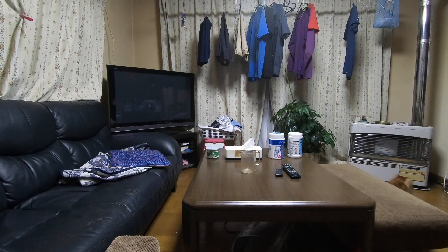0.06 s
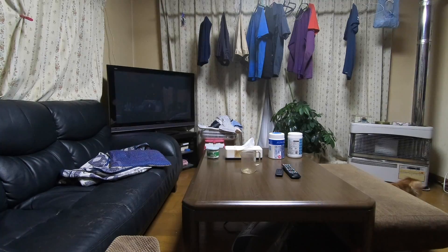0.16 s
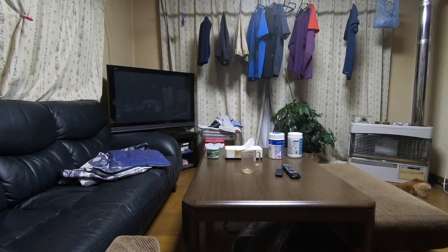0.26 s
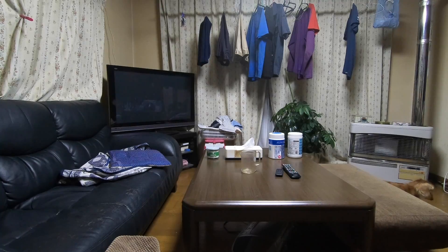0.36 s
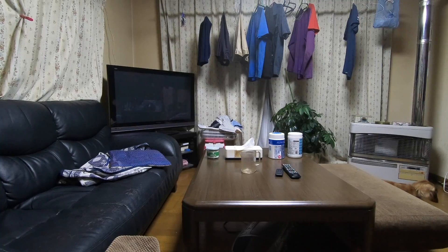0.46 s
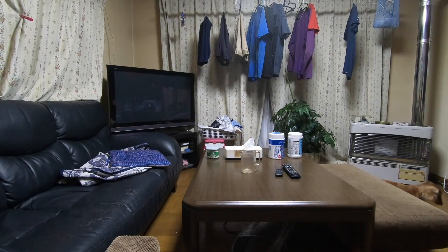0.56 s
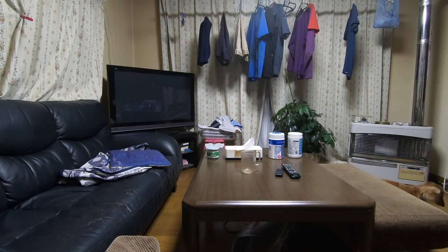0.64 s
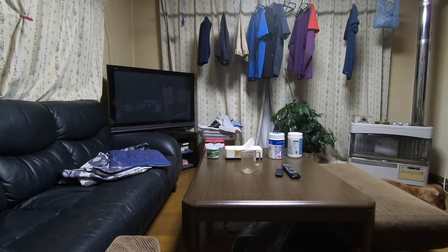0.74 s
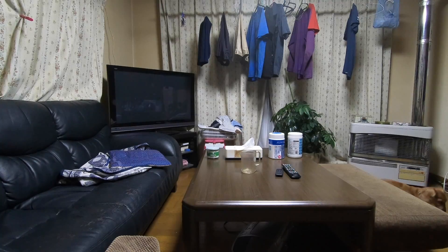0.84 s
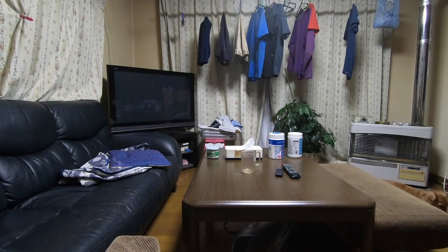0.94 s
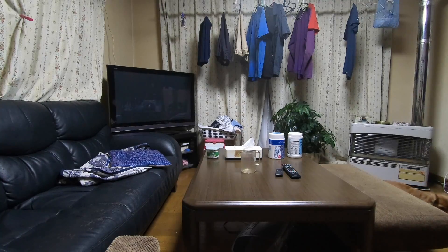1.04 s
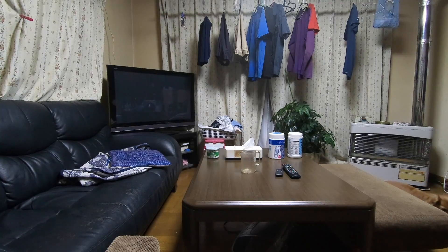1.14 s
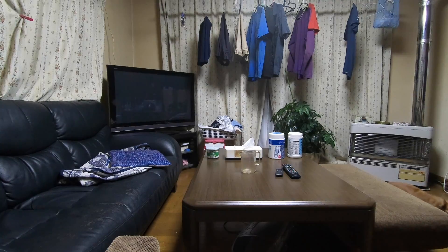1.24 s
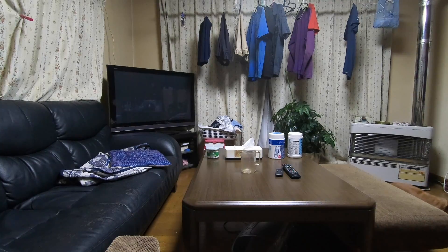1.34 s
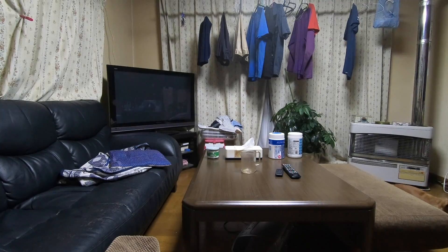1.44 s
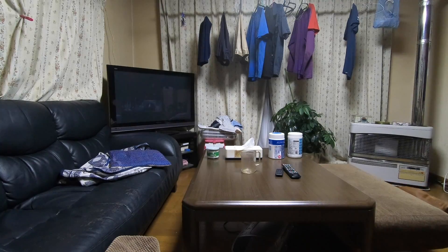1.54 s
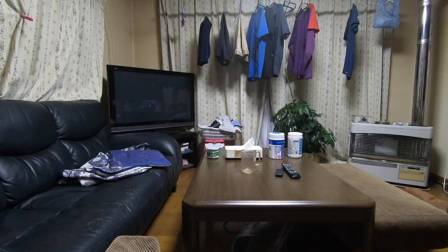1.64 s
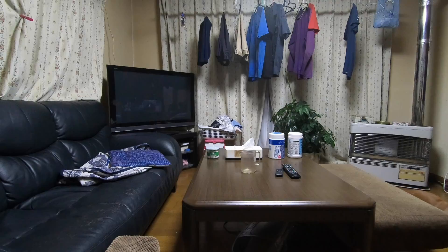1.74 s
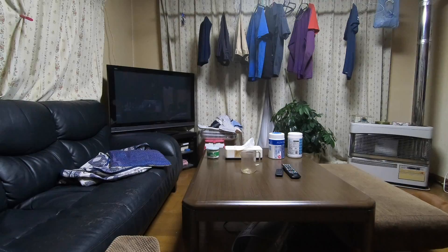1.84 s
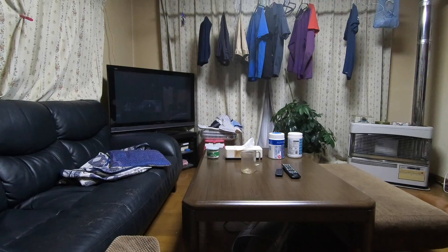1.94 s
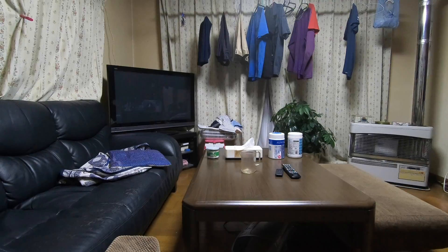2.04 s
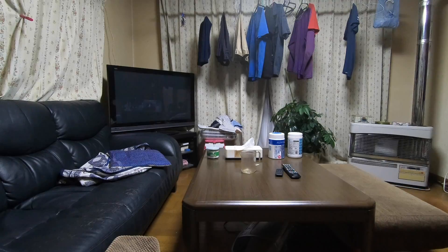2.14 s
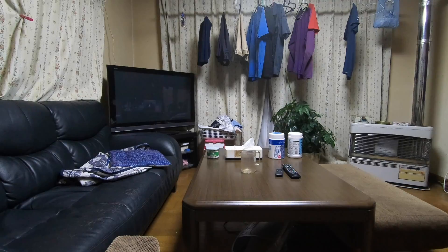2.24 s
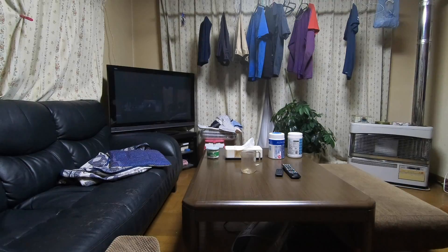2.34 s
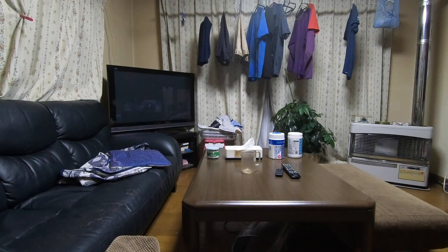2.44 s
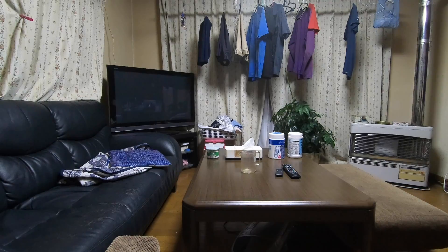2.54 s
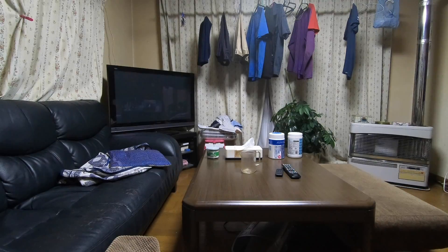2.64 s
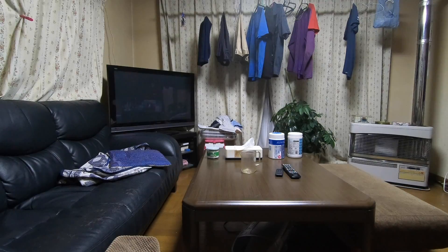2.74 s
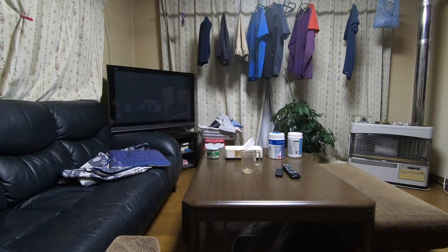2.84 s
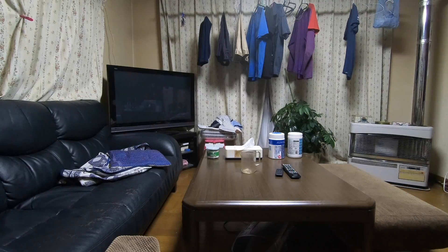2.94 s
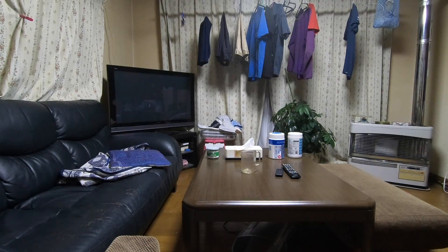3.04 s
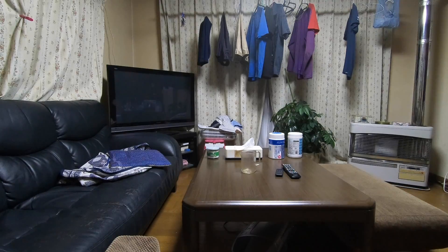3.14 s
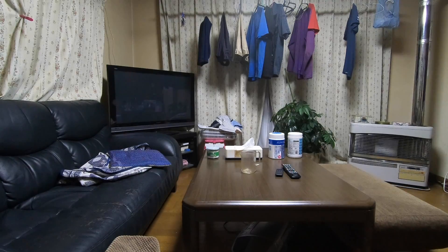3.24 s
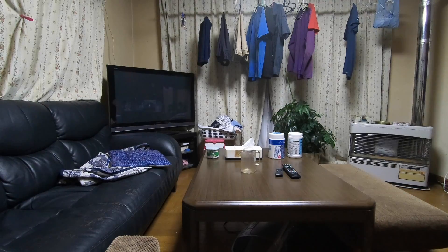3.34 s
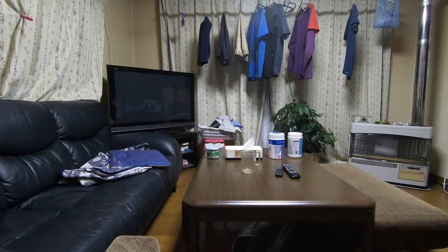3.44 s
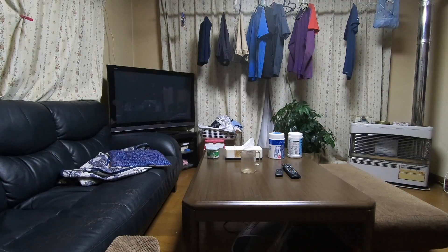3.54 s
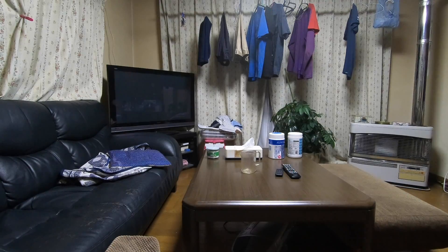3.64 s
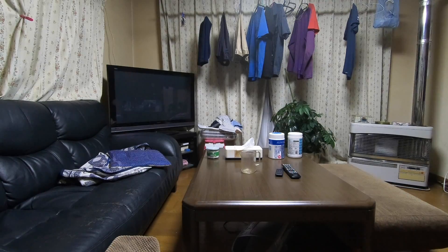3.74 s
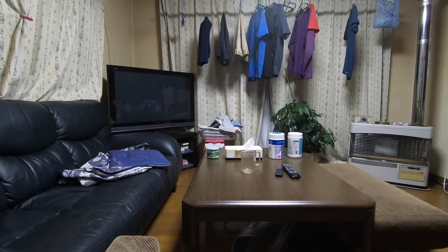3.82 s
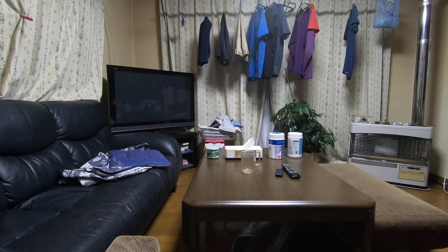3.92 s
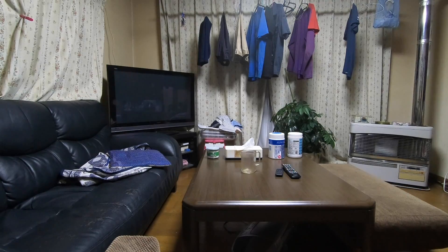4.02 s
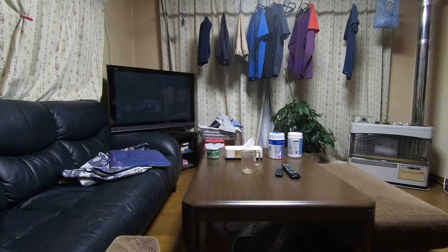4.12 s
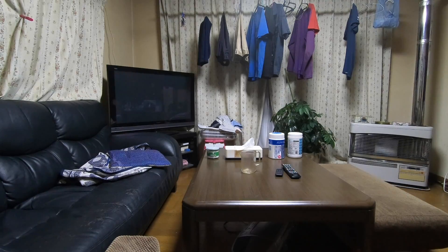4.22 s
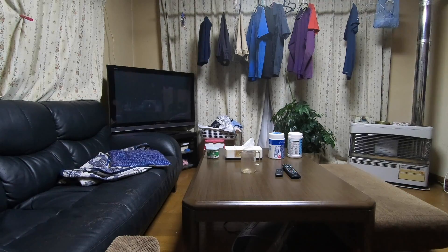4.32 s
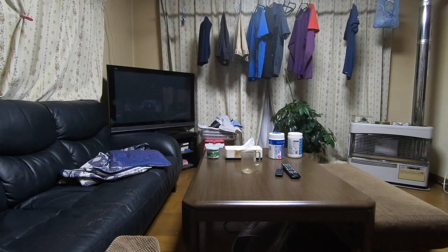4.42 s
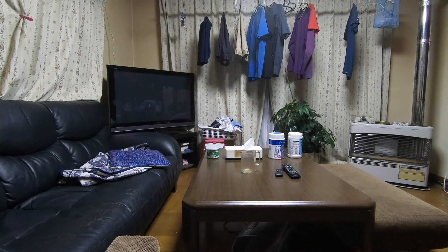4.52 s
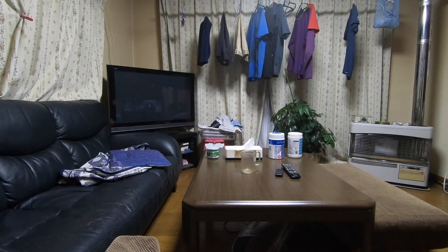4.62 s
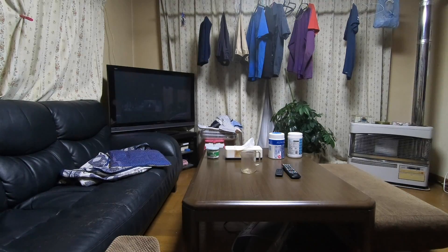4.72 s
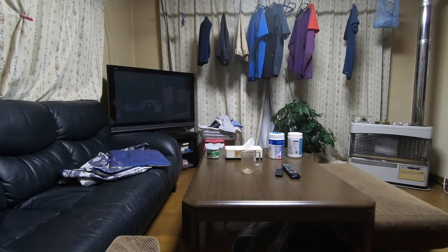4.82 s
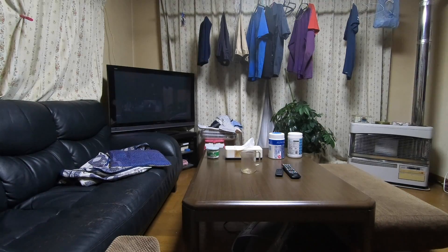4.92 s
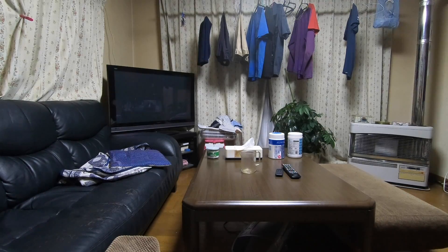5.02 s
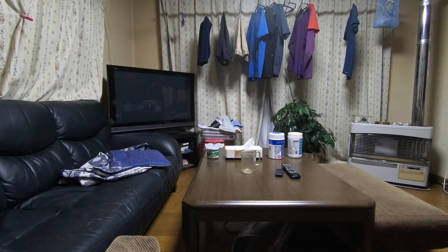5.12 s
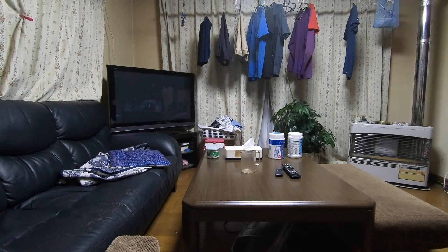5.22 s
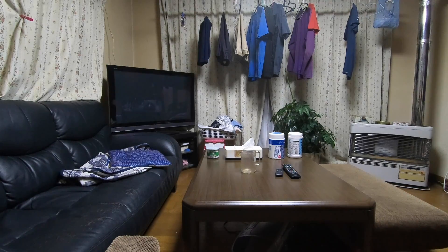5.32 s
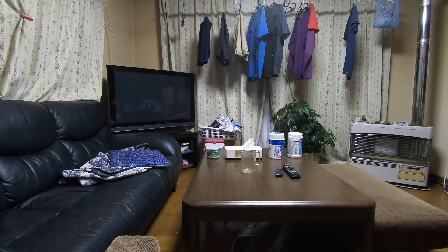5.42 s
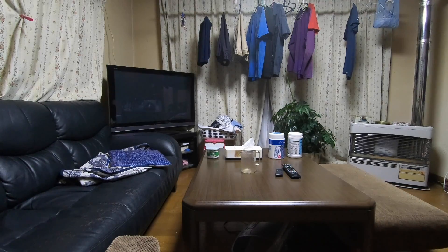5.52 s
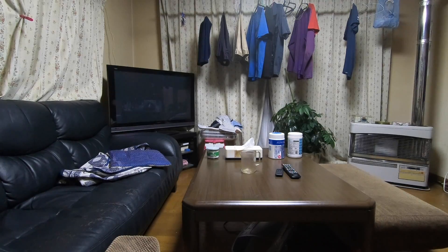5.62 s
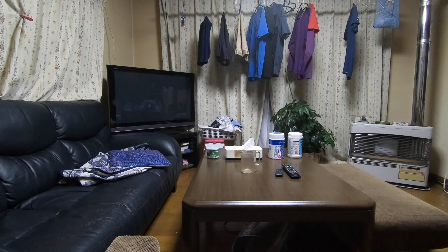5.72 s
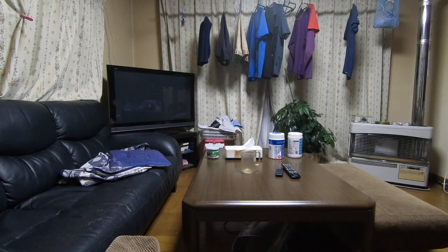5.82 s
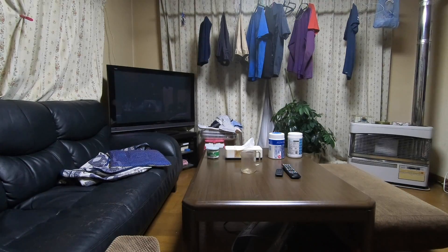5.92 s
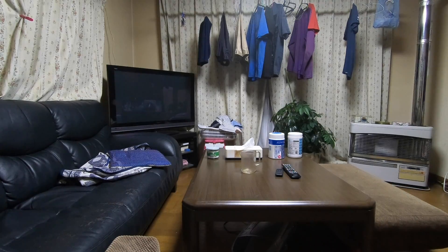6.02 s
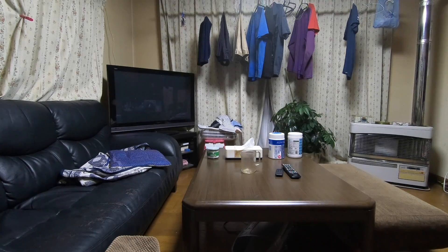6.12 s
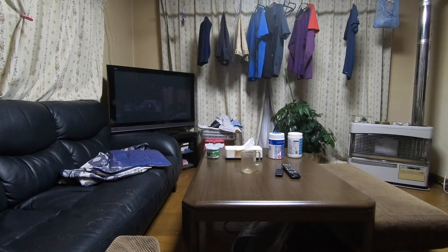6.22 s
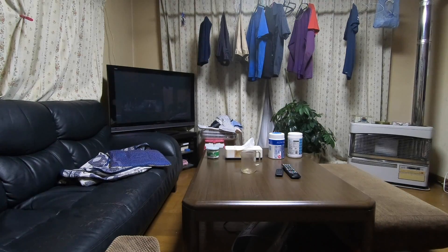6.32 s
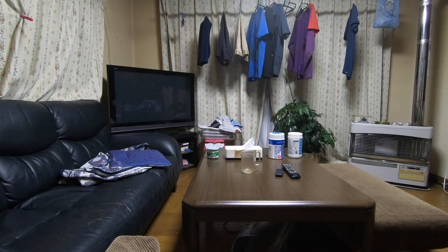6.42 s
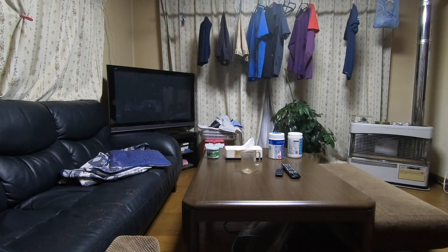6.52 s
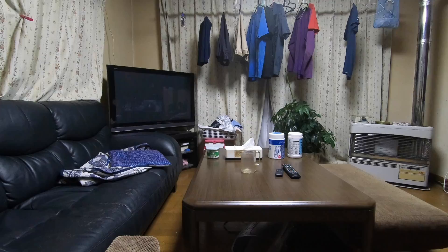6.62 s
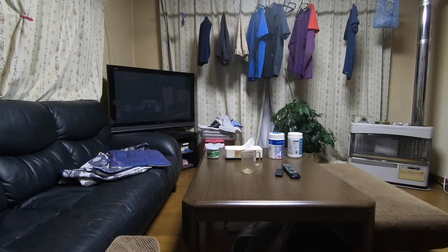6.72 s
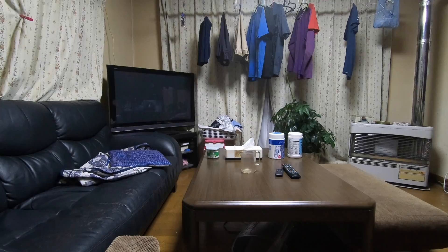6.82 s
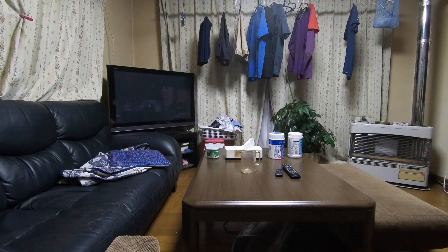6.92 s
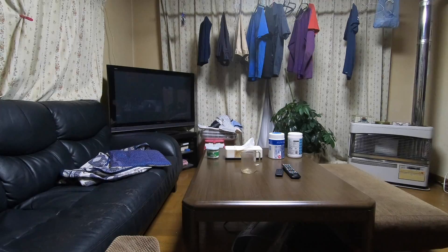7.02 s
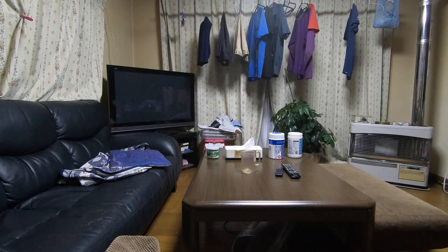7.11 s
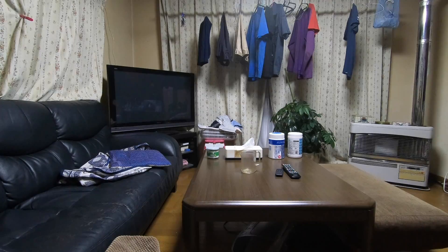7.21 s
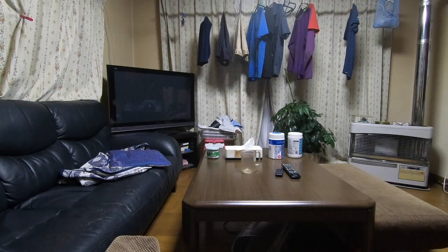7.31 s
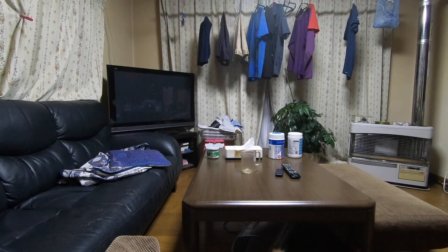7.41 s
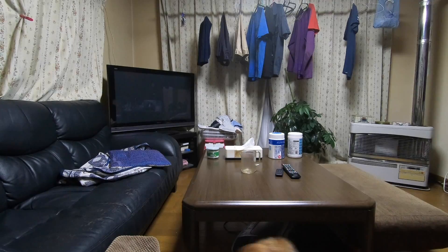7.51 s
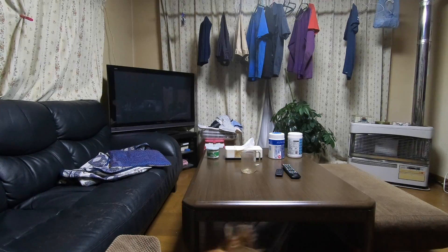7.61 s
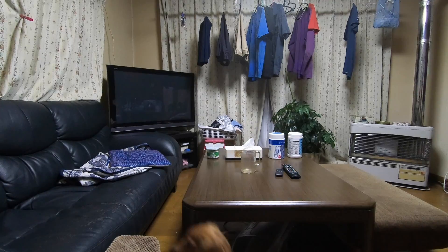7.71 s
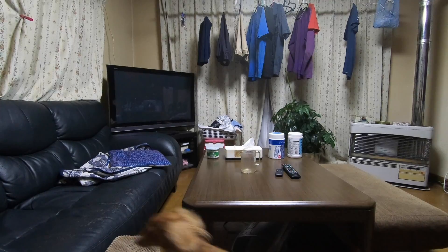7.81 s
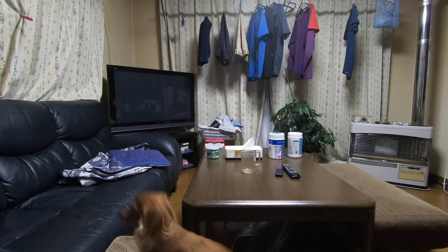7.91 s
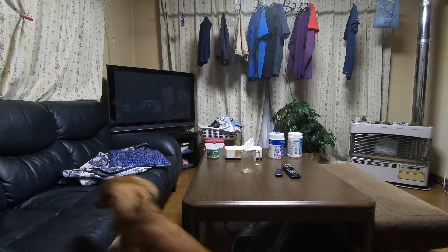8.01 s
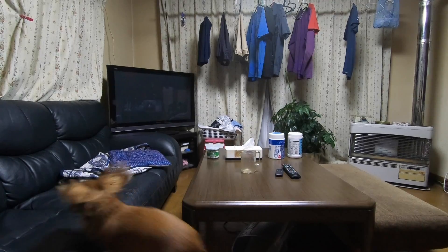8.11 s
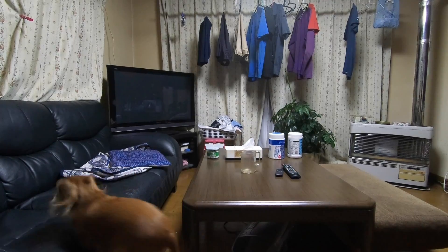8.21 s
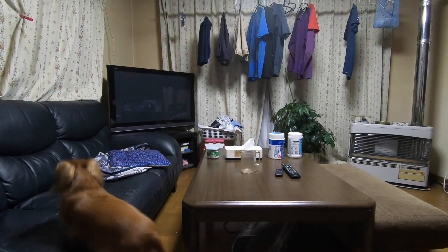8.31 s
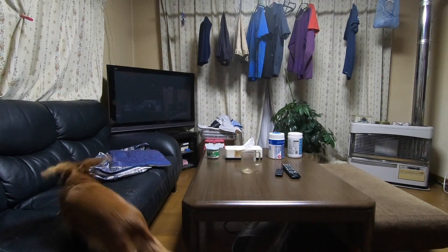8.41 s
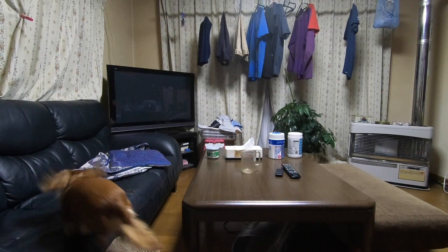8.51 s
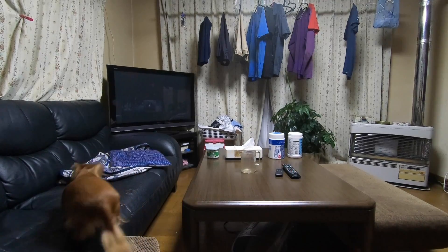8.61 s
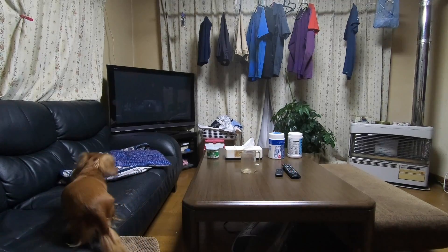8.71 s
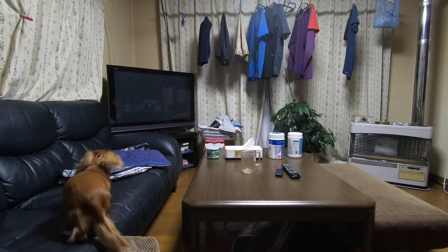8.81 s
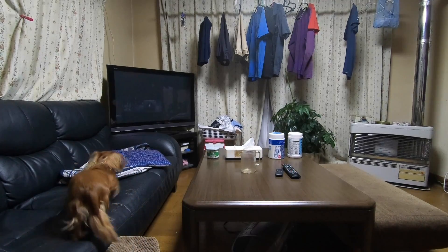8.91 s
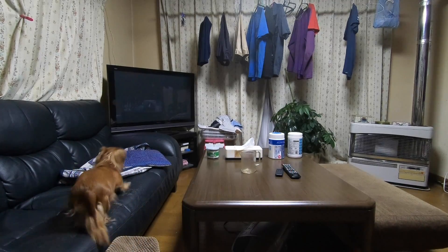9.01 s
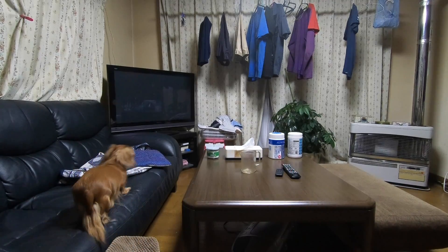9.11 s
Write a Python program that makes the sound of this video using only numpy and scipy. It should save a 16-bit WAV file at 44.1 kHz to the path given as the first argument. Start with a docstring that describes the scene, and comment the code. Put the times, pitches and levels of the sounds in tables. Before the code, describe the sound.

A stationary stereo microphone near a leather sofa picks up a steady fan-like hum and faint hiss. A small dog's nails brush and tick across a wooden floor with short room reflections, then stop for almost two seconds. They resume, speed up, and give way to a cluster of heavy low booms as it lands on the seat, with leather rustling, one last soft paw thump, then quiet room tone.

```python
"""In a living room a small dog trots round, claws clicking and scuffing on the wooden floor, and pauses.
It then bounds onto a leather sofa close by: deep thuds and rustling leather.
Claws are noise catches and clicks through a ringing filter; pads and seat are swelling low tones.
Leather, coat, boards and air are coloured noise; a knock is a few decaying partials.
Beneath lie a steady hum with a faint wavering tone, and a regular swish high above."""
import sys
import numpy as np
from scipy import signal
from scipy.fft import rfft, irfft, next_fast_len
from scipy.io import wavfile
from scipy.ndimage import map_coordinates

SR = 44100
rng = np.random.default_rng(int(sys.argv[2]) if len(sys.argv) > 2 else 0)


def file_out(sig):
    """Save sig as 16-bit WAV at sys.argv[1]."""
    # one column per channel
    cols = np.atleast_2d(sig).T
    # limit, then scale
    lim = np.clip(cols, -1, 1)
    pcm = np.round(lim * 32767).astype(np.int16)
    wavfile.write(sys.argv[1], SR, pcm)


N = 403647  # samples in the scene


def amp(db):
    """Decibels to gain."""
    return 10 ** (np.asarray(db) / 20)


def unit(x):
    """Scaled to rms 1."""
    return x / np.sqrt(np.mean(x ** 2) + 1e-20)


def along(points, hz):
    """(Hz, value) points read on a log frequency axis."""
    f, v = np.transpose(points)
    return np.interp(np.log(hz + 1), np.log(f + 1), v)


def wobble(rate):
    """A smooth random curve, rate knots a second."""
    knots = rng.standard_normal(int(N * rate / SR) + 4)
    return map_coordinates(knots, [np.arange(N) * rate / SR])


def filtered(x, response):
    """x times a response of frequency."""
    n = x.shape[-1]
    m = next_fast_len(n + 8192)
    return irfft(rfft(x, m) * response(np.fft.rfftfreq(m, 1 / SR)), m)[..., :n]


def causal(level_db):
    """The minimum-phase impulse response with these levels from 0 Hz to SR / 2."""
    cepstrum = irfft(np.log(amp(level_db)))
    half = len(cepstrum) // 2
    cepstrum[1:half] *= 2
    cepstrum[half + 1:] = 0
    return irfft(np.exp(rfft(cepstrum)))


def add(track, s, sound):
    """Mixes a sound into the track at time s."""
    part = track[..., round(s * SR):][..., :sound.shape[-1]]
    part += sound[..., :part.shape[-1]]


def pan(left_db):
    """Channel gains for a left-minus-right level."""
    return amp(np.array([[left_db], [-left_db]]) / 2)


def stroke(start_s, end_s, attack_s, fade_db_per_s):
    """An envelope that rises up to start_s, holds until end_s and dies away."""
    t = np.arange(N) / SR
    rise = np.exp(-(np.minimum(t - start_s, 0) / attack_s) ** 2)
    return rise * amp(-fade_db_per_s * np.maximum(t - end_s, 0))


# How alike left and right are in a diffuse sound: pitch_hz, likeness (-1 to 1)
CHANNEL_LIKENESS = [(60, 0.69), (170, 0.2), (290, -0.32), (640, -0.89), (1410, -0.7), (3100, 0.38),
                    (7000, 0.26), (15000, -0.0048)]


def diffuse(pair, tone):
    """Two unrelated signals as a coloured stereo field of rms 1."""
    def mid_side_response(hz):
        turn = np.arccos(np.clip(along(CHANNEL_LIKENESS, hz), -1, 1)) / 2
        return amp(along(tone, hz)) * [np.cos(turn), np.sin(turn)]

    mid, side = filtered(pair, mid_side_response)
    return unit(np.array([mid + side, mid - side]))


def swells(blows, lag=0):
    """Cushioned blows (s, dB, Hz, half length s): a low tone swells and fades fast; lag in radians."""
    out, t = np.zeros(N), np.arange(-SR // 6, SR // 6) / SR
    for s, db, pitch_hz, half_s in blows:
        swell = np.exp(-(t / half_s) ** 2)
        add(out, s + t[0], amp(db) * swell * np.cos(2 * np.pi * pitch_hz * t - lag))
    return out


def grumble(blows, tone):
    """Loose low vibration of a structure, following how hard the blows (s, dB, half length s) press."""
    t = np.arange(N) / SR
    press = sum(amp(db) / np.cosh(np.clip((t - s) / half_s, -20, 20)) for s, db, half_s in blows)
    return press * diffuse(rng.standard_normal((2, N)), tone)


# How long the room's tail takes to fall 60 dB: pitch_hz, t60_s
ROOM_DECAY = [(200, 1), (2000, 0.29), (3500, 0.28), (6500, 0.21), (12000, 0.44)]


def room_answer(wet_db, walls_db, build_s, smear_s=0.0034):
    """The room from one spot: a direct sound smeared by the boards, furniture reflections, a diffuse tail."""
    hz, t, z = signal.stft(rng.standard_normal((2, SR // 3)), SR, nperseg=256)
    decay = amp(-60 * t / along(ROOM_DECAY, hz)[:, None])
    build = 1 - np.exp(-t / build_s)
    tail = signal.istft(z * decay * build, SR, nperseg=256)[1]
    answer = amp(wet_db) * tail / np.linalg.norm(tail[0])
    for side in answer:
        delays_s = rng.uniform(.003, .02, size=6)
        side[(SR * delays_s).astype(int)] += amp(walls_db) * rng.standard_normal(6)
    t = np.arange(SR // 200) / SR
    shared = rng.standard_normal(len(t))
    near = (shared + 0.49 * rng.standard_normal((2, len(t)))) * np.exp(-t / smear_s)
    near = irfft(np.exp(1j * np.angle(rfft(near))))  # spread in time, even in colour
    add(answer, 0, pan(-4.0) * near * np.exp(-t / 0.0079))
    return answer / np.linalg.norm(answer)


# Steps on the boards: start_s, level_db (relative), scuff_share (0 click to 1 scuff),
# last_nail_share (0-1), ring_hz, bright_db (weight of the treble tilt), snap_db (top treble)
STEPS = [(.326, -68, 0.4, 0, 2300, 1, -5), (.492, -55.5, .9, .02, 6040, 2, -4),
         (.702, -58, .9, 0, 6370, 2, -3), (1.015, -59.5, 0.9, .01, 2600, -3, -15),
         (1.309, -58.5, 1, 0.1, 6200, 2, 0), (1.602, -52.5, .8, 0.65, 6430, 3.5, -10),
         (1.854, -62.5, 0.9, 0.44, 4000, 1, -12), (2.007, -67, .7, 0, 5940, -4, 2),
         (2.106, -49, 0.7, 0.4, 3900, 7.5, -13), (2.345, -50, 0.25, 0.2, 4340, 2.5, 4),
         (2.599, -50, 0.57, 0.47, 2620, 1, -8), (2.839, -47.5, 0.27, 0.13, 3890, 3, -6),
         (3.002, -62.5, 0.15, 0.35, 6350, 1.5, -1), (3.12, -51, 0.47, 0.48, 6010, 1.5, -9),
         (3.326, -51.5, .06, 0.3, 4260, 4.5, -20), (3.73, -58.5, 1, 0.36, 2360, -2.5, -15),
         (5.56, -58, 0.45, 0, 5800, 0.5, -15), (5.82, -49, 0.16, 0, 6430, 5.5, -3),
         (6.115, -55.5, 0.7, 0.1, 5400, 4, -11), (6.381, -56, 0.16, 0.66, 6450, 2, -4),
         (6.625, -54, 0.6, 0.78, 6100, 6.5, -9), (6.854, -49, 0.07, 0.22, 6200, 3.5, 8),
         (7.05, -65.5, .7, .1, 6500, 4, 0), (7.089, -49, 1, 0, 6140, 3.5, -7),
         (7.245, -53.5, 0.8, 0.66, 3120, 5.5, -4), (7.431, -47.5, 0.44, .4, 6700, 2.5, -7),
         (7.494, -51.5, .05, 0.1, 6500, 2, -3), (7.635, -54.5, 0, 0.1, 5360, 11, 0)]
ROLL_S, ROLL_DB = .017, -54  # first to last nail in a step of this level
QUICKEN_DB = 16  # this much harder halves the roll time
LAST_SCUFF, LAST_DULL_DB = 0.25, 5  # the last nail lands more click than scuff, and snaps less


def nails():
    """A paw rolls from first nail to last, faster in a hard step: (s, dB, scuff, colour) of each contact."""
    for s, db, scuff, late, ring_hz, bright_db, snap_db in STEPS:
        late = np.clip(late, .01, .99)
        roll_s = ROLL_S * 2 ** ((ROLL_DB - db) / QUICKEN_DB)
        yield s, db + 10 * np.log10(1 - late), scuff, (ring_hz, bright_db, snap_db)
        last_colour = (ring_hz, bright_db, snap_db - LAST_DULL_DB)
        yield s + roll_s, db + 10 * np.log10(late), LAST_SCUFF, last_colour


# Basic colour of a nail on wood: pitch_hz, level_db (relative)
CLAW_TONE = [(800, -22.5), (1400, -9), (2000, -4), (2500, -0.5), (3200, 1), (4000, 0.5), (4900, -3.5),
             (5600, -2), (6400, -2.5), (7200, -6.5), (9000, -16), (13000, -34), (15500, -52)]


def claws(scuff_s=0.0098, lead_s=.014, catches_per_s=900, ring_db=7.0, ring_width_hz=170,
          uneven_db=1.25, gain_db=34):
    """Nails brush the boards in a swell of tiny catches and land with a click, ringing at the step's pitch."""
    out, t = np.zeros((2, N)), np.arange(SR // 16) / SR - lead_s
    hz = np.fft.rfftfreq(1024, 1 / SR)
    for s, db, scuff, (ring_hz, bright_db, snap_db) in nails():
        share = np.clip(scuff, 0, 1)
        swell = np.exp(-((t - .006) / scuff_s) ** 2)  # crests 6 ms after the click
        catches = rng.standard_normal(len(t)) * (rng.random(len(t)) < catches_per_s / SR) * swell
        force = np.sqrt(share) * catches / np.linalg.norm(catches)
        force[round(lead_s * SR)] += 1 - share
        ring = ring_db / (1 + ((hz - ring_hz) / ring_width_hz) ** 2)
        uneven = uneven_db * map_coordinates(rng.standard_normal(256), [hz / 300])
        bright = bright_db * along([(4000, -1.1), (6000, 0.26), (9000, 0.2)], hz)
        snap = snap_db * along([(7500, 0), (11000, 1)], hz)
        colour_db = along(CLAW_TONE, hz) + bright + snap + ring + uneven
        click = signal.fftconvolve(force, causal(colour_db))
        # a clean strike stands out from the room more than a brush does
        room = room_answer(wet_db=2.3 + 1.6 * share, walls_db=-11.5, build_s=0.0085)
        heard = signal.fftconvolve(click[None], room, axes=1)
        add(out, s - lead_s, amp(db + gain_db) * heard / np.linalg.norm(heard))
    return out * pan(-2.0)


# Phase of left against right in the claw sounds: pitch_hz, phase_rad
CLAW_PHASE = [(500, 4.5), (1700, 2.5), (3200, 1.33), (4500, -0.2), (6500, -0.9), (10000, -4.2)]


def phase_spread(pair):
    """Claws spread in phase between the channels, half the angle each way."""
    signs = np.array([[1], [-1]])
    return filtered(pair, lambda hz: np.exp(.5j * signs * along(CLAW_PHASE, hz)))


# Colour of the boards under a step: pitch_hz, level_db (relative)
TREAD_TONE = [(20, -2), (45, -2), (80, -9.5), (120, -13), (170, -1), (215, -1), (300, -11), (800, -24),
              (1500, -47.5)]
TREAD_DB, TREAD_LAG_S, TREAD_HALF_S = -7, 0.027, 0.052  # offset from the step's table level, delay, half length


def tread():
    """Just after the nails the paw takes the weight, and the boards murmur."""
    loads = [(s + TREAD_LAG_S, db + TREAD_DB, TREAD_HALF_S) for s, db, *_ in STEPS]
    return grumble(loads, TREAD_TONE) * pan(-3)


# Soft paw falls on the floor: crest_s, level_db (relative), pitch_hz
PAW_FALLS = [(.24, -54, 81.4), (3.484, -41.5, 176.4), (6.7, -45, 79), (7.189, -47, 81), (7.401, -43.5, 182),
             (7.474, -43.5, 82.4), (7.539, -41, 176), (8.657, -39, 156.5)]
PAD_HALF_S, JOIST_DB = 0.022, -10  # half length of a paw fall; joist grumble against its table level


def paws(boom_db=-3):
    """Soft pads set the floor booming and the joists grumbling."""
    boom = swells([(s, db, hz, PAD_HALF_S) for s, db, hz in PAW_FALLS])
    loads = [(s, db + JOIST_DB, PAD_HALF_S) for s, db, _ in PAW_FALLS]
    joists = grumble(loads, [(25, 6.0), (90, -1), (190, 3.5), (300, -10.5), (1000, -34), (3000, -68)])
    return (amp(boom_db) * boom + joists) * pan(-10)


# The dog's weight on the sofa: crest_s, level_db (boom envelope peak, right channel), half_length_s
BOUNDS = [(7.673, -20, 0.029), (7.775, -21, 0.025), (7.909, -12.5, 0.035), (8.007, -22, 0.017),
          (8.161, -30, 0.031), (8.294, -36.5, 0.032)]
SEAT_HZ = 73.6  # resonance of the seat
FRAME_DB, FRAME_GROWS = -28.5, 0.58  # frame grumble under a 0 dB blow; its dB per dB of the blow


def sofa(left_db=-11):
    """The seat booms close by, nearly opposite in phase in the two channels; the frame grumbles along."""
    blows = [(s, db, SEAT_HZ, half_s) for s, db, half_s in BOUNDS]
    boom = np.array([amp(left_db) * swells(blows, lag=2.4), swells(blows)])
    strain = [(s, FRAME_DB + FRAME_GROWS * db, half_s) for s, db, half_s in BOUNDS]
    frame_tone = [(25, -12.0), (50, 5), (110, 2.0), (190, -2.5), (270, -15.5), (500, -20),
                  (1000, -47), (3000, -68)]
    return boom + grumble(strain, frame_tone) * pan(-5)


# Paws rubbing over the leather: start_s, held_s, level_db (relative)
RUBS = [(7.644, .025, -53.5), (7.744, 0.034, -59), (7.85, 0.057, -62.5), (7.987, 0.037, -55),
        (8.084, 0.07, -57.5), (8.235, 0.051, -57.5), (8.525, 0.017, -69)]
# Faint steady rustle under the rubs: start_s, end_s, level_db (relative)
RUSTLE_BED = (7, 8.55, -69.5)
# Colour of rubbed leather: pitch_hz, level_db (relative)
LEATHER_TONE = [(200, -35), (400, -1), (700, -5.5), (1000, -3.5), (1700, -5), (2600, -10), (3600, -9),
                (4900, -13.5), (6300, -8), (7300, -15.5), (8400, -24), (13000, -46)]
RUB_ATTACK_S, RUB_FADE_DB_PER_S = 0.018, 220


def leather(grain_db=0.5, crinkle=0.23, gain_db=2.6, wander_db=2.0, body_db_per_db=0.39):
    """Leather rubs in dense small slips with sparse crinkles; the colour shifts with the grip."""
    contacts = [(s, s + held_s, db) for s, held_s, db in RUBS] + [RUSTLE_BED]
    power = sum((amp(db) * stroke(start, end, RUB_ATTACK_S, RUB_FADE_DB_PER_S)) ** 2
                for start, end, db in contacts)
    rustle_db = 10 * np.log10(power + 1e-20)
    slips = unit(rng.standard_normal((2, N)) * amp(grain_db * wobble(700)))
    crinkles = unit(rng.standard_normal((2, N)) * (rng.random(N) < 150 / SR))  # about 150 a second
    rub = diffuse(slips + crinkle * crinkles, LEATHER_TONE)
    dull = filtered(rub, lambda hz: 1 / (1 + (hz / 3500) ** 4))
    grip_db = wander_db * wobble(27) + body_db_per_db * (rustle_db + 65)  # a firm rub has more body
    return amp(rustle_db + gain_db) * (rub + (amp(grip_db) - 1) * dull) * pan(-1.6)


# Spans of audible fur brushing: start_s, end_s
BRUSHING = [(0, 4.04), (5.5, 6.3)]
# Colour of brushing fur: pitch_hz, level_db (relative)
COAT_TONE = [(500, -16), (1200, 2.5), (2000, -11), (3200, -4.5), (5000, -12.5), (9000, -9), (15000, -40)]


def coat(level_db=-76.0, uneven_db=2.5, attack_s=.1, fade_db_per_s=80):
    """Fur brushes faintly in these spans, as unevenly swelling noise."""
    brushing = sum(stroke(start, end, attack_s, fade_db_per_s) for start, end in BRUSHING)
    level = amp(level_db + uneven_db * wobble(8))
    return brushing * level * diffuse(rng.standard_normal((2, N)), COAT_TONE) * pan(-2.1)


# A light wooden knock: start_s, level_db (peak of the direct ring, before the room is added)
KNOCKS = [(3.683, -43.5)]
# Partials of the knocked wood: pitch_hz, level_db (relative), t60_s
WOOD_PARTIALS = [(470, -3, 0.065), (615, -3, 0.091), (726, 9, 0.052), (794, 5, 0.063), (950, -3, 0.15),
                 (1210, -3, 0.12), (1270, -6, .09)]


def knock(wet_db=-6):
    """Something wooden is nudged and rings briefly."""
    out, t = np.zeros((2, N)), np.arange(SR // 5) / SR
    ring = sum(amp(db - 60 * t / t60) * np.sin(2 * np.pi * hz * t) for hz, db, t60 in WOOD_PARTIALS)
    ring /= np.abs(ring).max()
    for s, db in KNOCKS:
        room = signal.fftconvolve(ring[None], room_answer(wet_db=13, walls_db=-16, build_s=.005), axes=1)
        add(out, s, amp(db) * ring[None])
        add(out, s, amp(db + wet_db) * room)
    return out


# Colour of the swish: pitch_hz, level_db (relative)
SWISH_TONE = [(2000, -23), (3800, 6.5), (4800, -11), (6000, 2), (7700, 7), (8600, -9), (9800, 6),
              (11000, -17), (15000, -38)]
SWISH_RATE = 6  # per second


def swish(level_db=-76, first_s=.11, half_s=0.033):
    """A faint high swish, evenly six times a second, as of a sweeping clock movement."""
    beats = (np.arange(N) / SR - first_s) * SWISH_RATE
    from_beat_s = (beats - np.round(beats)) / SWISH_RATE
    uneven_db = 1.8 * wobble(SWISH_RATE)
    pulse = np.exp(-(from_beat_s / half_s) ** 2) * amp(level_db + uneven_db)
    return pulse * diffuse(rng.standard_normal((2, N)), SWISH_TONE) * pan(1.6)


# Colour of the airy hum: pitch_hz, level_db (relative)
HUM_TONE = [(10, -7.5), (30, 3), (42, 0.5), (55, -11), (80, -14), (115, -18), (152, -0.5), (190, 0.5),
            (260, -12), (360, -15), (470, -16), (560, -19), (680, -11), (850, -12), (1000, -23.5),
            (2500, -50.5)]
# Colour of the hiss above it: pitch_hz, level_db (relative)
HISS_TONE = [(300, -32), (1100, 18.5), (2000, 9), (3000, 2), (3900, 3.5), (4800, -4.5), (6000, 3.5),
             (7600, 1), (8500, -5), (10000, 0), (11500, -7.5), (13500, -5), (15500, -23)]


def background(hum_db=-53.5, hiss_db=-69.0, surge_db=0.56):
    """A steady airy hum, as of a fan, with faint hiss above it; the lowest rumble surges a little."""
    hum = amp(hum_db) * diffuse(rng.standard_normal((2, N)), HUM_TONE) * pan(-1.1)
    rumble = filtered(hum, lambda hz: 1 / (1 + (hz / 280) ** 4))
    surge = (amp(surge_db * wobble(6.2)) - 1) * rumble
    hiss = amp(hiss_db) * diffuse(rng.standard_normal((2, N)), HISS_TONE)
    return hum + surge + hiss * pan(0.73)


def hum_tone(hz=162.4, level_db=-65, waver=0.54):
    """A faint low sine in the hum, its phase wandering at random; waver in radians."""
    phase = 2 * np.pi * hz * np.arange(N) / SR + waver * wobble(5)
    return amp(level_db) * np.sqrt(2) * np.sin(phase) * pan(-1.3)


def scene():
    """Dog and room together."""
    dog = phase_spread(claws()) + paws() + coat() + sofa() + leather() + knock() + tread()
    return dog + swish() + background() + hum_tone()


TOP_HZ = 15700  # nothing is kept from here up


def record(dry):
    """The treble rolls off steeply towards the band limit, and nothing is kept above."""
    return filtered(dry, lambda hz: (hz < TOP_HZ) / np.sqrt(1 + (hz / 14700) ** 40))


dry = scene()
out = record(dry)
file_out(out)
```